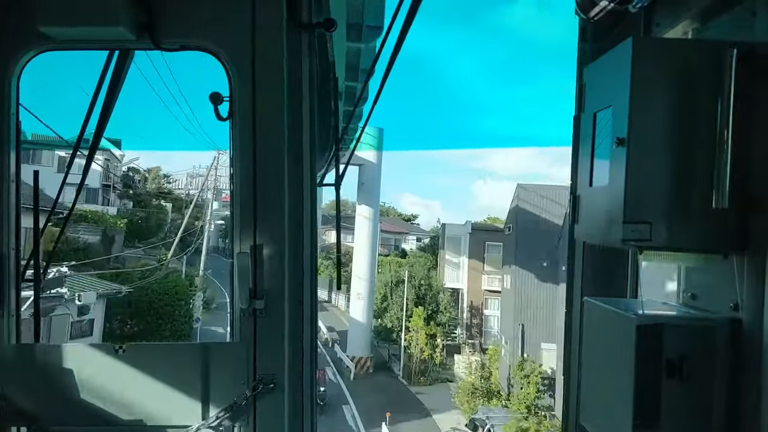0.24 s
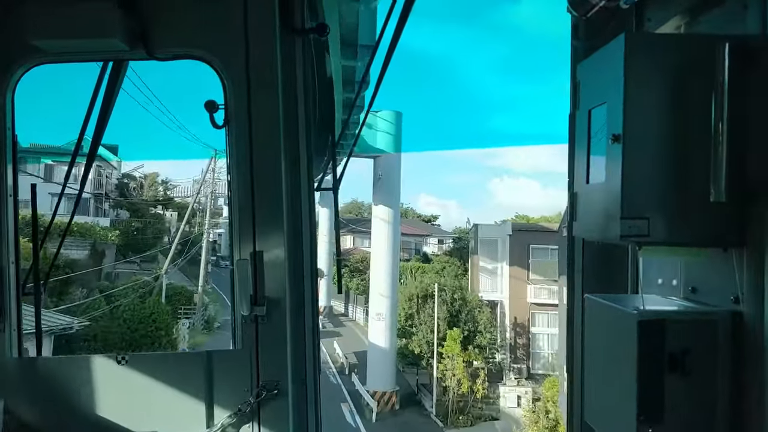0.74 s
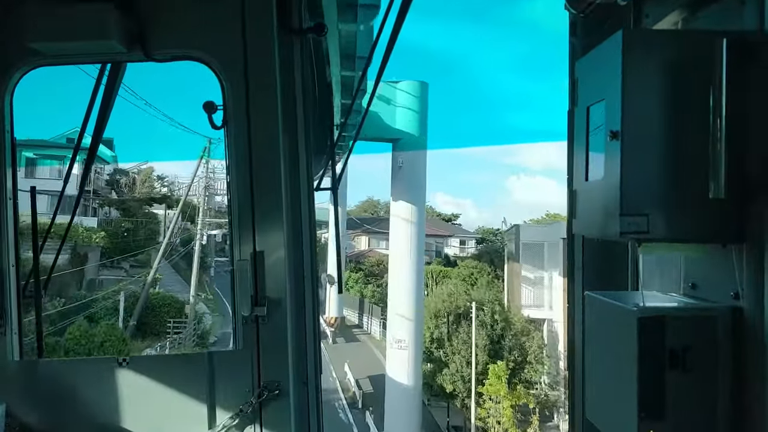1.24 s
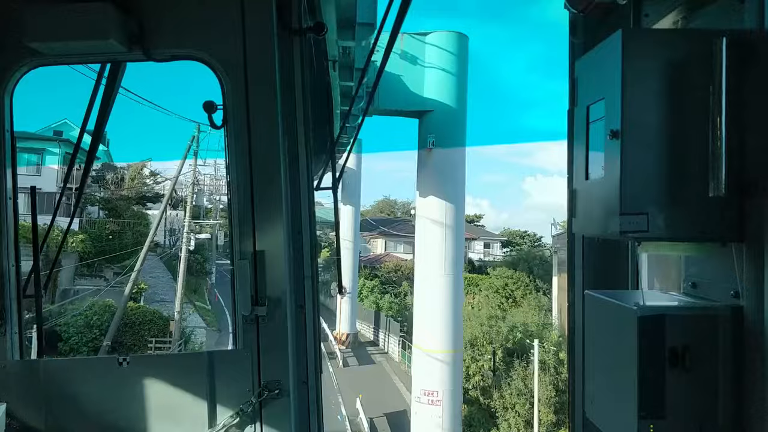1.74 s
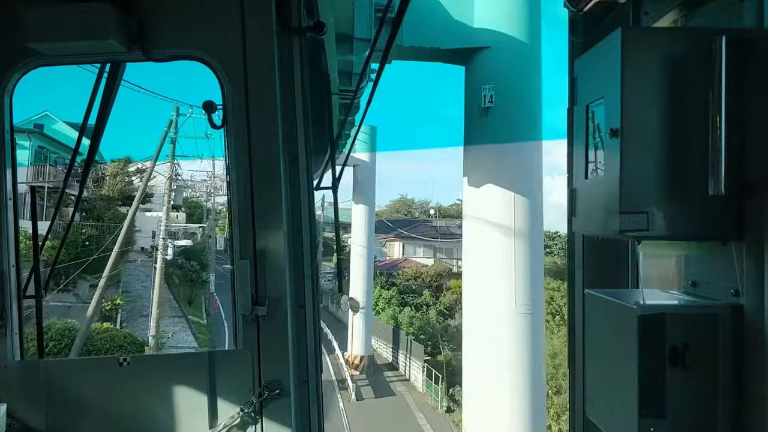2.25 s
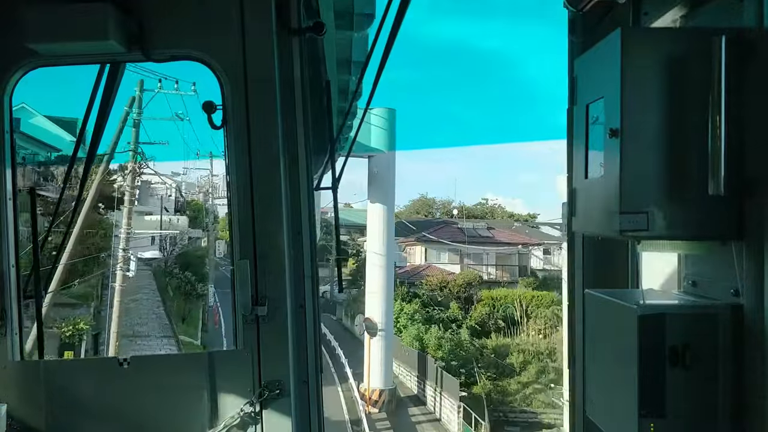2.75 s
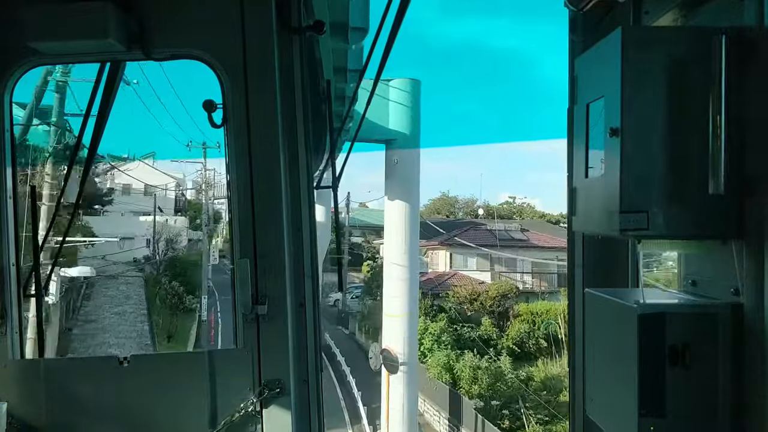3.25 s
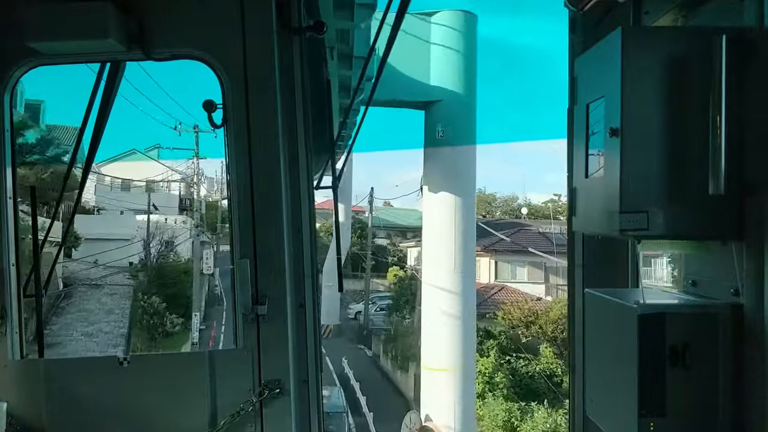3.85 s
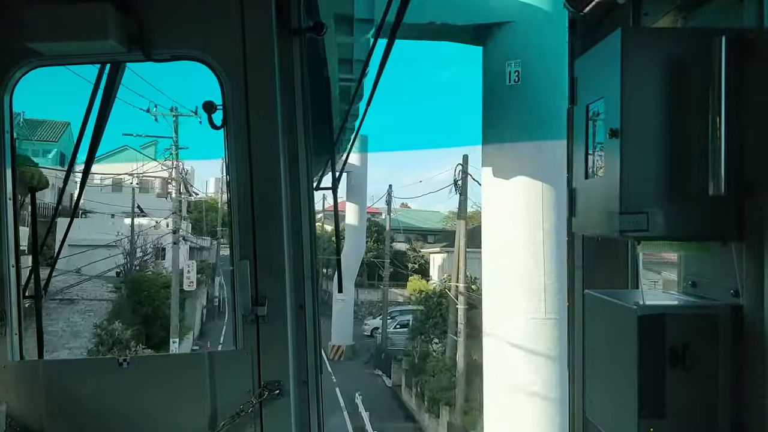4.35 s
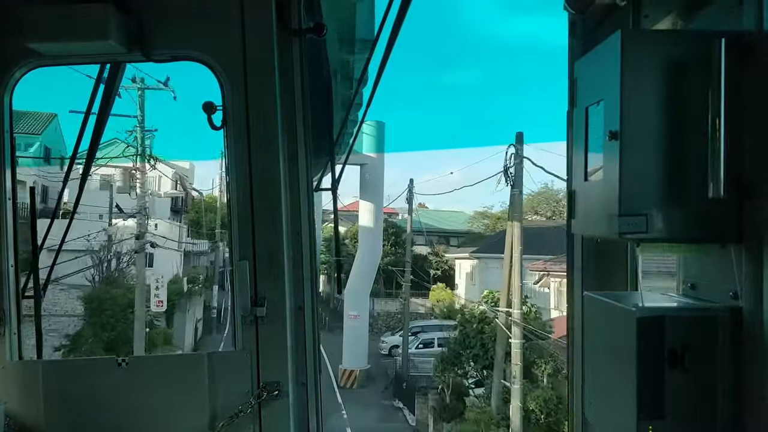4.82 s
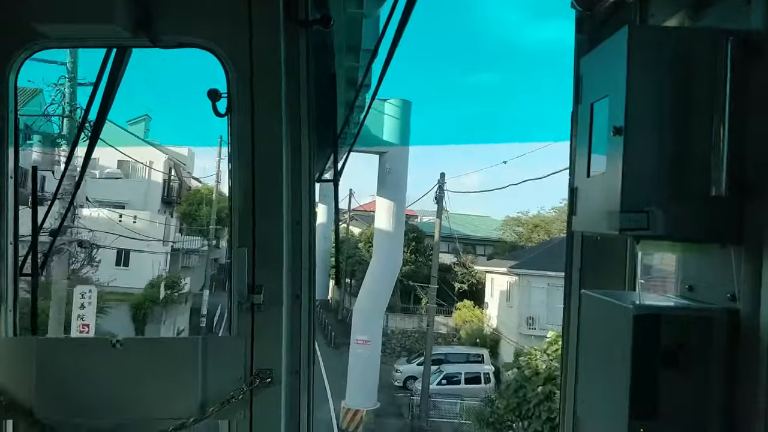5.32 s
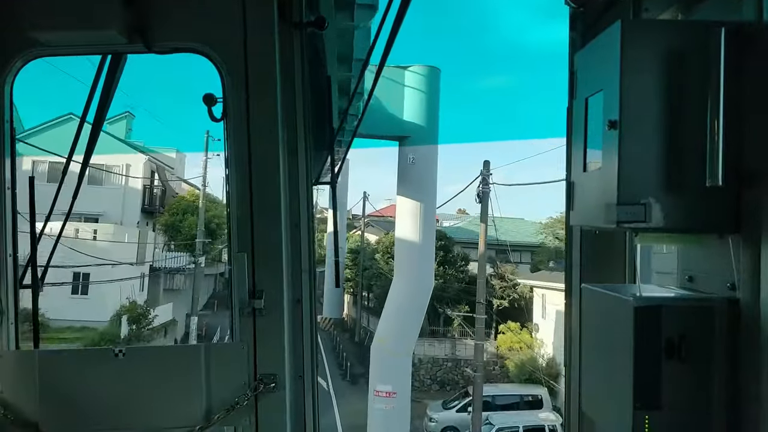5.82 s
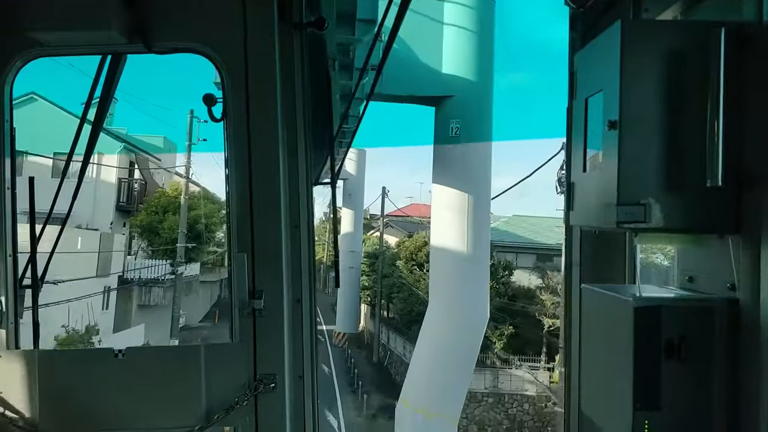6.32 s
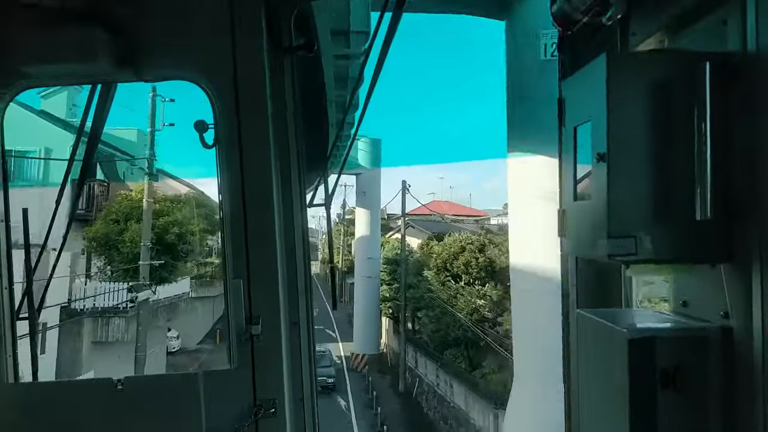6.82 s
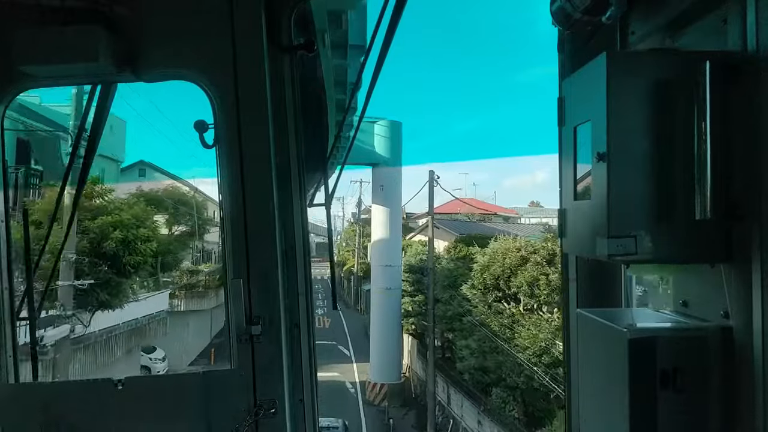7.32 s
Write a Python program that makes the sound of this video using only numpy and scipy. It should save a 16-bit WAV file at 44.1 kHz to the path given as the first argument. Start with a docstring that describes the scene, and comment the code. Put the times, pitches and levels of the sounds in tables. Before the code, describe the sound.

Inside a suspended train's front cab at speed, deep rumble and rubber-tyre roar surge with dull knocks, while loose fittings click and overhead contacts hiss.

```python
"""Suspended monorail, front cab at speed

A stereo microphone inside the cab. Coloured noise makes the car body's rumble and boom, and the roar
of rubber tyres in the girder, which surges over each bump; decaying tones make the dull and hard knocks.
Overhead the current collectors hiss, spit and briefly squeak in bands of high noise. Close around
the microphone, loose fittings and panels click, crack, tick and thump as short bursts and ringing modes.
"""
import sys
import numpy as np
from scipy import signal
from scipy.fft import rfft, irfft
from scipy.io import wavfile
from scipy.ndimage import uniform_filter1d, minimum_filter1d

SR = 44100
rng = np.random.default_rng(int(sys.argv[2]) if len(sys.argv) > 2 else 0)


def unload_wav(signal):
    """Save mono or channel-first audio to the path in sys.argv[1] as 16-bit WAV at rate SR, clipped to [-1, 1]."""
    wavfile.write(
        sys.argv[1],
        SR,
        np.round(np.clip(np.atleast_2d(signal).T, -1, 1) * 32767).astype(np.int16),
    )


N = 333837
TIME = np.arange(N) / SR  # s
HZ = np.fft.rfftfreq(N, 1 / SR)

# All table levels are relative; each layer adds its own trim. Positive left-right values lean left.
# Likeness of the two microphone channels. Each row: frequency in Hz, correlation from 0 to 1.
LIKENESS = [(20, .997), (60, .975), (120, .88), (180, .65), (240, .48), (310, .68), (390, .7), (450, .42),
            (510, .68), (640, .64), (740, .22), (930, .25), (1200, 0), (16000, 0)]
# Slow swells of the car body. Each row: time in seconds, deep shaking in dB, boom of the cabin air in dB.
BODY_SWELLS = [(0, -17.5, -23), (.75, -16, -22), (1.05, -23.5, -26), (1.45, -17, -27), (1.7, -20.5, -20.5),
               (2.03, -15, -20), (2.2, -15, -29), (3.0, -19.5, -18), (3.3, -14, -19.5),
               (3.75, -19.5, -21.5), (4.05, -19.5, -15.5), (4.55, -19, -22.5), (5.0, -19, -16.5),
               (5.7, -16, -19), (6.55, -19, -18), (7.57, -16, -19)]
# Spectrum of the deep shaking. Each row: frequency in Hz, level in dB.
SHAKE_COLOUR = [(5, -10), (14, 8.5), (26, -3.5), (42, 4), (55, -51), (90, -3), (200, -99)]
# Spectrum of the running gear's drone. Each row: frequency in Hz, level in dB.
DRONE_COLOUR = [(30, -14), (52, -11), (72, 4), (88, -4), (115, -8), (145, -8.5), (200, -17), (500, -82)]
# The bogie frame thuds against its springs. Each row: start in seconds, level in dB.
THUDS = [(1.335, -3), (1.748, -3.5), (3.999, -3.5), (5.87, -6), (6.441, -0.5)]
# Low modes of the car. Each row: frequency in Hz, level in dB, 60 dB decay time in seconds.
THUD_MODES = [(61.3, -14, 0.68), (105, -18, 0.068), (136.7, 4.5, 0.18), (180, -23, 0.064)]
# A side panel thumps in its frame. Each row: start in seconds, peak in dB.
THUMPS = [(.528, -13), (1.058, -5.5), (3.114, -14), (3.659, -7.5), (4.03, -10), (5.078, -10), (5.188, -4),
          (6.698, -7.5), (7.095, -13), (7.36, -12)]
# Modes of the side panel. Each row: frequency in Hz, level in dB, 60 dB decay time in seconds.
THUMP_MODES = [(167.6, -5, 0.18), (250, -6, 0.08), (313, -2, 0.1), (426, -7, 0.12), (516, -3, 0.039)]
# A loose fitting clicks. Each row: start in seconds, level in dB, left-right difference in dB.
CLICKS = [(.2525, -41, 15), (.2585, -47, 6), (.318, -42, 9), (.627, -40, 17), (.704, -43, 15),
          (.8665, -47, 10), (1.0598, -33.5, 23), (1.7933, -32, 19), (2.2294, -40, 18), (2.372, -43, 12),
          (2.8198, -33.5, 20), (3.0125, -36.5, 17), (3.361, -35, 20), (3.987, -47, 10), (4.06, -35.5, 20),
          (4.396, -34.5, 17), (4.4693, -38.5, 15), (4.551, -34, 21), (4.6462, -42, 12), (4.924, -34.5, 15),
          (5.121, -41, 15), (5.1907, -31.5, 20), (6.378, -43, 10), (6.948, -41.5, 11), (7.3484, -44, 11),
          (7.3592, -37.5, 21)]
# Modes of the loose fitting. Each row: frequency in Hz, level in dB, 60 dB decay time in seconds.
CLICK_MODES = [(1270, -2, .012), (1560, -3, .014), (1760, -2, .013), (2150, 2.5, .016), (2420, 3, .011),
               (3400, -5, .008), (3750, -1, .011), (4270, -2, .009), (4750, -3, .008), (5300, -1, .009),
               (5650, -1.5, .009), (5950, -5, .008)]
# Wall panels crack as the car flexes. Each row: start in seconds, peak in dB, left-right difference
# in dB, brightness in dB per octave.
CRACKS = [(.527, -20, 6, -2), (.931, -22, 0, -7.5), (1.6134, -22, -1, -5), (2.0012, -29, 3, -3),
          (2.5712, -26, -1, -1), (2.6425, -19, 9, -14), (2.82, -23, 1, -1), (3.8496, -32, 6, -1),
          (4.0105, -33, -1, -9), (5.035, -29, 0, -2), (5.05, -21, -1, -9), (5.0778, -16.5, 2, -4.5),
          (5.094, -21, -3, -8), (5.1315, -24, 3, -3), (5.1544, -28, -7, 0), (5.191, -14.5, 1, -6),
          (5.352, -18, 5, 0.5), (5.506, -18, 0, -12), (5.6136, -27, -2, 0.5), (5.956, -25, -3, -4),
          (6.2035, -23, -6, -8), (6.299, -23, 2, -5), (6.376, -15.5, 7, -15), (7.012, -18.5, 14, -6)]
# Spectrum of a crack. Each row: frequency in Hz, level in dB.
CRACK_COLOUR = [(400, 9), (1200, 9), (1800, -1), (2300, 3), (3100, 1.5), (4800, 2), (6000, -7), (7400, -6),
                (8600, -17), (15000, -15)]
# A small metal part ticks. Each row: start in seconds, peak in dB.
TICKS = [(.2138, -38), (.35, -36), (.72, -45), (1.625, -40), (1.7657, -42), (1.8305, -38), (1.941, -44),
         (2.102, -40), (2.149, -36), (2.2076, -38), (2.2383, -35), (2.5112, -44), (2.5253, -42),
         (2.6168, -42), (2.8667, -37), (3.0011, -37), (3.1118, -42), (3.4486, -38), (3.713, -37),
         (4.1577, -44), (4.2235, -32), (4.5101, -33), (4.7391, -37), (4.757, -37), (4.916, -32),
         (5.0784, -44), (5.3203, -33), (5.46, -39), (5.6042, -34), (5.6623, -36), (5.9209, -37),
         (6.1409, -39), (6.2714, -37), (6.5315, -40), (7.1252, -37), (7.273, -31)]
# Spectrum of a tick. Each row: frequency in Hz, level in dB.
TICK_COLOUR = [(3000, -28), (6000, -2), (9000, -8), (10200, 4.5), (11200, 11.5), (12200, -16), (14000, 8),
               (16000, -23)]
# Thin squeaks of a collector. Each row: start in seconds, level in dB, length in seconds.
SQUEAKS = [(0.272, -46, 0.069), (0.582, -56, 0.044)]
# Steady sliding of the collectors. Each row: time in seconds, hiss in dB, fine sizzle in dB.
SLIDING = [(0.0, -50, -60), (0.93, -51, -64), (1.43, -47.5, -57.5), (1.71, -51.5, -62.5),
           (2.97, -51.5, -62.5), (3.1, -48, -60), (3.19, -50, -66), (3.73, -52.5, -58.5),
           (4.03, -52.5, -62.5), (4.45, -47.5, -58), (4.61, -50.5, -59), (4.75, -47, -60), (4.88, -51, -62),
           (5.08, -49.5, -60), (5.4, -45.5, -52.5), (5.84, -48.5, -58.5), (5.97, -48, -52.5),
           (6.27, -49, -59), (6.33, -52, -58), (6.42, -48.5, -55), (6.68, -46.5, -51.5), (6.75, -48, -57),
           (6.99, -52, -61), (7.07, -45, -58), (7.4, -56.5, -72), (7.57, -52, -65)]
# A collector spits and the hiss dies away in the girder. Each row: start in seconds, bright sizzle
# in dB, lower hiss in dB, 60 dB decay time in seconds.
SPITS = [(.043, -44, -62, 0.16), (.279, -46, -60, .37), (.335, -47, -41, 0.38), (.931, -46, -49, 0.32),
         (1.352, -37.5, -41, 0.18), (1.78, -47, -41, 0.48), (2.294, -45, -40, 0.3), (2.365, -42, -57, 0.18),
         (2.821, -41, -42, 0.37), (3.298, -39, -45, 0.33), (3.498, -40, -40, 0.51), (3.772, -38, -39, 0.31),
         (4.257, -36, -49, 0.22), (4.383, -40, -45, 0.27), (4.509, -45, -38.5, .2), (4.787, -39, -49, 0.16),
         (5.153, -40, -38, 0.23), (5.234, -43, -62, .35), (5.38, -43.5, -47, 0.3), (5.516, -45, -52, 0.24),
         (5.62, -53, -38, 0.41), (5.714, -40, -45, 0.27), (5.921, -37, -38.5, 0.27), (6.015, -42, -55, .27),
         (6.226, -43, -39, 0.29), (6.48, -45, -50, 0.27), (6.58, -45, -55, 0.4), (6.706, -42, -42, 0.29),
         (6.77, -41, -52, 0.21), (6.82, -59, -36.5, 0.32), (7.078, -45, -48, 0.56), (7.124, -37, -52, 0.24),
         (7.27, -39, -40, 0.26), (7.523, -41, -52, .35)]
# Spectrum of the collectors' hiss. Each row: frequency in Hz, level in dB.
HISS_COLOUR = [(600, 0), (1400, 6.5), (2100, 1.5), (2900, 2), (3900, 3), (5000, 1), (6000, -6.5),
               (7300, -8.5), (8600, -21), (11000, -29), (16000, -40)]
# Spectrum of the collectors' sizzle. Each row: frequency in Hz, level in dB.
SIZZLE_COLOUR = [(1500, -44), (4000, -5), (7000, -4), (8700, -9), (10200, -3), (12000, -2), (13500, 1.5),
                 (14800, 1), (16000, -0.5)]
# Placing of the sizzle. Each row: frequency in Hz, left-right difference in dB.
SIZZLE_PAN = [(4000, 13), (8500, -3), (10500, 0.5), (12000, 4.5), (13500, 11), (15000, 14), (16000, 20)]
# Roughness of the running surface, as rolling level. Each row: time in seconds, level in dB.
ROLL = [(0, -26), (.3, -23.5), (.5, -25.5), (.95, -25), (1.4, -18.5), (1.7, -23.5), (1.95, -24.5),
        (2.6, -25), (3.0, -24), (3.37, -27), (3.85, -21.5), (4.22, -24), (4.62, -22), (5.1, -24),
        (5.42, -21), (5.78, -24.5), (6.03, -19.5), (6.6, -24), (6.78, -27), (7.2, -24.5), (7.57, -28)]
# Brief dips, and a few lifts, of the roar. Each row: centre in seconds, level change in dB.
LULLS = [(1.155, -2), (1.41, -1), (1.505, 0.5), (2.366, -3.5), (2.63, -1.5), (3.255, -1), (3.395, -2),
         (3.62, -3), (3.985, -2), (4.235, 3), (4.63, -5.5), (4.89, -6), (5.125, -1), (5.168, 0.5),
         (5.27, -3), (5.77, -7.5), (5.925, -3), (6.306, 2), (6.485, -4.5)]
# The tyres hit a bump or land from a bounce. Each row: time in seconds, surge of the roar in dB,
# hard knock in dB, pitch in Hz, swell time in seconds.
BUMPS = [(.066, -31, -28, 486, 0.0053), (.132, -37, -32, 420, 0.0098), (.186, -24, -13.5, 517, 0.034),
         (.529, -26.5, -36, 450, 0.017), (.70, -25.5, -19, 524, 0.012), (.962, -23, -18, 534, 0.024),
         (1.058, -26, -22, 395, 0.0041), (1.112, -20, -33, 520, 0.016), (1.21, -28, -19, 370, 0.013),
         (1.32, -19.5, -25, 430, 0.0082), (1.432, -27, -11.5, 587, 0.019), (1.522, -23, -11.5, 540, 0.043),
         (1.598, -20.5, -12.5, 500, 0.02), (1.663, -21, -24, 408, 0.016), (1.748, -20.5, -16, 430, 0.029),
         (2.0, -22, -23, 527, 0.015), (2.138, -20.5, -23, 544, 0.016), (2.268, -27, -24, 397, 0.029),
         (2.387, -23.5, -14, 644, 0.025), (2.456, -20, -31, 483, 0.015), (2.524, -22, -25, 460, .016),
         (2.76, -25, -16, 485, 0.028), (3.024, -24, -26, 520, 0.014), (3.417, -28, -16.5, 610, 0.027),
         (3.486, -23.5, -17, 520, 0.029), (3.645, -27, -12.5, 555, 0.018), (3.752, -16.5, -9.5, 580, 0.023),
         (3.879, -14.5, -6.5, 537, 0.017), (4.005, -23.5, -13, 470, 0.024), (4.136, -18.5, -17, 420, 0.023),
         (4.26, -36, -19, 520, 0.023), (4.382, -18, -8.5, 530, 0.031), (4.515, -22.5, -16, 453, 0.021),
         (4.662, -19, -23, 540, 0.02), (4.692, -19.5, -12, 485, 0.025), (4.804, -26, -14, 516, 0.012),
         (5.048, -31, -28, 464, 0.035), (5.188, -26, -24, 386, 0.016), (5.293, -24, -25, 540, 0.011),
         (5.315, -16.5, -13, 450, 0.016), (5.404, -18.5, -21, 500, .014), (5.448, -19.5, -30, 433, 0.021),
         (5.508, -18.5, -14.5, 524, 0.019), (5.647, -19, -14, 525, 0.026), (5.95, -16.5, -11, 530, 0.018),
         (6.067, -6.5, -10, 570, 0.011), (6.088, -14, -11, 490, 0.0057), (6.208, -17.5, -23, 514, 0.014),
         (6.332, -32, -19, 605, 0.024), (6.408, -22, -11.5, 514, 0.027), (6.449, -16.5, -10.5, 523, 0.03),
         (6.513, -17, -9, 566, 0.015), (6.575, -16, -12, 500, 0.018), (6.632, -21, -19, 586, 0.036),
         (6.885, -23.5, -17.5, 432, 0.029), (7.078, -20.5, -16, 494, 0.047), (7.355, -20, -24, 450, 0.0092)]
# Spectrum of the tyres. Each row: frequency in Hz, level in dB.
TYRE_COLOUR = [(60, -1), (120, -5.5), (170, -2), (240, 1), (340, 2.5), (450, -4.5), (600, -7), (720, -14),
               (900, -16.5), (1250, -26), (1650, -29.5), (2100, -41), (4000, -43.5), (9000, -74)]
# Cabin resonances at the microphone. Each row: frequency in Hz, width in Hz, left in dB, right in dB.
CABIN = [(168, 18, 6, 4), (215, 50, 1, -2), (268, 14, 1.5, 3), (388, 16, 9, 5.5), (416, 12, 5, 0),
         (464, 27, -2, -3), (498, 24, 8, 1), (545, 10, 2, 8), (578, 20, 3, 4), (634, 26, 6, 7),
         (712, 24, 4, 1), (740, 18, 3, 7), (890, 30, 5, 4), (1130, 20, 4, 1), (1234, 16, 4, 1)]
# Modes of the cab after a knock. Each row: frequency in Hz, level in dB, 60 dB decay time in seconds.
KNOCK_MODES = [(377.4, -6, 0.27), (491.3, -2, 0.15), (570, -17, 0.032), (658.7, -9.5, 0.33),
               (730.4, -8, 0.17), (870, -16, 0.045), (1164, -17.5, 0.059)]


def gain_of(db):
    """Decibels to amplitude."""
    return 10 ** (np.asarray(db) / 20)


def evened(x):
    """Scales to rms 1."""
    return x / np.sqrt(np.mean(x ** 2) + 1e-20)


def read(points, hz):
    """Reads a spectrum table on a log-frequency axis."""
    f, value = np.transpose(points)
    return np.interp(np.log(hz + 1), np.log(f + 1), value)


def level(curve, column=1):
    """One dB column of a time curve as a gain for every sample."""
    rows = np.transpose(curve)
    return gain_of(np.interp(TIME, rows[0], rows[column]))


def sides(pan_db):
    """Left and right gains of unit mean power for a level difference."""
    pan = np.atleast_1d(pan_db)
    pair = gain_of(np.array([pan, -pan]) / 2)
    return pair / np.sqrt(np.mean(pair ** 2, axis=0))


def add(mix, s, sound):
    """Mixes a stereo sound in at time s."""
    part = mix[:, max(round(s * SR), 0):][:, :sound.shape[1]]
    part += sound[:, :part.shape[1]]


def wander(rate_hz):
    """Smooth random motion of rms 1: noise under a Gaussian low-pass."""
    return evened(irfft(rfft(rng.standard_normal(N)) * np.exp(-(HZ / rate_hz) ** 2), N))


def noise(colour_db, pan_db):
    """Coloured stereo noise, alike in the bass and diffuse in the treble."""
    a, b = rfft(rng.standard_normal((2, N)))
    same = np.clip(read(LIKENESS, HZ), -1, 1)
    pair = np.array([a, same * a + np.sqrt(1 - same ** 2) * b])
    return evened(irfft(pair * gain_of(colour_db) * sides(pan_db), N))


def steadied(x, span_s):
    """Evens out a noise's own swells slower than span_s, so that the ride sets its level."""
    power = np.mean(abs(signal.hilbert(x)) ** 2, axis=0)
    power = uniform_filter1d(power, max(int(span_s * SR), 1))
    return evened(x / np.sqrt(abs(power) + 1e-9))


def ringing(modes, phases, t):
    """Sum of struck modes: sines, each dying exponentially; phases in turns."""
    return sum(gain_of(db - 60 * t / t60) * np.sin(2 * np.pi * (hz * t + phase))
               for (hz, db, t60), phase in zip(modes, phases))


def snap(colour, decay_s, tail_db, tail_s, tilt_db=0):
    """A very short noise burst, followed by its scatter off the cab walls; peak near 1."""
    t = np.arange(SR // 10) / SR
    envelope = np.exp(-t / decay_s) + gain_of(tail_db) * np.exp(-t / tail_s)
    burst = rng.standard_normal((2, len(t))) * envelope
    hz = np.linspace(0, SR / 2, 65)
    colour_db = read(colour, hz) + tilt_db * np.log2(np.maximum(hz, 1200))
    taps = signal.firwin2(len(hz), hz, gain_of(colour_db), fs=SR)
    sound = signal.fftconvolve(burst, taps[None], axes=1)
    loudest = uniform_filter1d(sound ** 2, size=SR // 500, axis=1).max(axis=1, keepdims=True)
    return sound / np.sqrt(loudest) / gain_of(11)  # the peak stands about 11 dB over the rms


def throb(rate_hz=4.7, depth_db=4, deepest_s=4.98, fade_s=1.75):
    """Gain of a slow throb in the bass, deepest mid-ride and fading either side."""
    t = TIME - deepest_s
    return gain_of(depth_db * np.exp(-(t / fade_s) ** 2) * np.cos(2 * np.pi * rate_hz * t))


def car_body(boom_hz=57.9, boom_width_hz=4.8, drone_db=-21, drone_growth_db_per_s=0.19):
    """Deep shaking, the growing drone of the running gear, and one narrow air mode of the cabin."""
    shake = steadied(noise(read(SHAKE_COLOUR, HZ), .4), 0.19) * level(BODY_SWELLS)
    drone = steadied(noise(read(DRONE_COLOUR, HZ), 1.0), 0.1)
    drone = drone * gain_of(drone_db + drone_growth_db_per_s * TIME)
    mode_db = -20 * np.log10(1 + ((HZ - boom_hz) / boom_width_hz) ** 2)
    boom = steadied(noise(mode_db, 0.86), 0.13) * level(BODY_SWELLS, 2)
    return shake + (drone + boom) * throb()


def thuds(thud_db=-2, rise_s=0.034):
    """Soft, deep blows that ring the low modes of the car."""
    out, t = np.zeros((2, N)), np.arange(SR // 3) / SR
    for s, db in THUDS:
        modes = ringing(THUD_MODES, rng.random(len(THUD_MODES)), t)
        add(out, s, gain_of(db + thud_db) * sides(1) * modes * (1 - np.exp(-t / rise_s)))
    return out


def thumps(thump_db=-4, pan_db=8, rise_s=0.0027):
    """Short hollow blows that ring a panel to the left of the microphone."""
    out, t = np.zeros((2, N)), np.arange(SR // 6) / SR
    for s, db in THUMPS:
        modes = ringing(THUMP_MODES, rng.random(len(THUMP_MODES)), t)
        blow = modes * (1 - np.exp(-t / rise_s))
        add(out, s, gain_of(db + thump_db) * sides(pan_db) * blow / abs(blow).max())
    return out


def click(rise_s=.0005, detune=0.014, variety_db=3.5, scatter_db=-24, scatter_s=0.014):
    """Damped modes of the loose fitting, varied at each blow, with early reflections; rms 1 at the start."""
    t = np.arange(SR // 16) / SR
    shifts = 1 + detune * rng.uniform(-1, 1, len(CLICK_MODES))
    favour_db = variety_db * rng.uniform(-1.1, 1, len(CLICK_MODES))
    struck = [(hz * shift, db + favour, t60)
              for (hz, db, t60), shift, favour in zip(CLICK_MODES, shifts, favour_db)]
    # neighbouring modes start in opposite directions
    modes = ringing(struck, np.arange(len(struck)) % 2 / 2, t) * (1 - np.exp(-(t / rise_s) ** 2))
    shape = (2, len(t))
    sparse = rng.standard_normal(shape) * (rng.random(shape) < .08)
    walls = gain_of(scatter_db) * sparse * np.exp(-t / scatter_s)
    walls[:, 0] = 1  # the direct sound
    sound = signal.fftconvolve(modes[None], walls, axes=1)
    return sound / np.sqrt(np.mean(sound[:, :SR // 300] ** 2))


def chatter(count=70, crack_db=-38, tick_db=-53, range_db=6):
    """Faint small cracks and ticks strewn at random around the cab."""
    out = np.zeros((2, N))
    for crack_at, size, tick_at in rng.random((count, 3)):
        size_db = range_db * size
        crack = snap(CRACK_COLOUR, 0.0023, -14, 0.0077, tilt_db=1.0)
        add(out, crack_at * N / SR, gain_of(crack_db + size_db) * crack)
        tick = snap(TICK_COLOUR, 0.0024, -15, .012)
        add(out, tick_at * N / SR, gain_of(tick_db + size_db) * tick)
    return out


def fittings(click_db=1.5, crack_db=7.0, tick_db=3, tick_pan_db=2):
    """Ringing clicks and noise-burst cracks and ticks, over the faint chatter."""
    out = chatter()
    for s, db, pan in CLICKS:
        add(out, s, gain_of(db + click_db) * sides(pan) * click())
    for s, db, pan, tilt in CRACKS:
        crack = snap(CRACK_COLOUR, 0.0011, -17, 0.013, tilt)
        add(out, s, gain_of(db + crack_db) * sides(pan) * crack)
    for s, db in TICKS:
        tick = snap(TICK_COLOUR, 0.0013, -12, 0.017)
        add(out, s, gain_of(db + tick_db) * sides(tick_pan_db) * tick)
    return out


def squeaks(squeak_hz=13600, width_hz=260):
    """A collector sings briefly in a narrow, very high band of noise."""
    swell = sum(gain_of(db) * np.sin(np.pi * np.clip((TIME - s) / length, 0, 1))
                for s, db, length in SQUEAKS)
    return swell * noise(-20 * np.log10(1 + ((HZ - squeak_hz) / width_hz) ** 2), 6)


def spits(spit_db=-2, snap_s=0.0028):
    """Power of the bright and lower parts of each spit, a fast onset with an exponential decay."""
    bright, lower = np.zeros((2, N))
    for s, bright_db, lower_db, t60 in SPITS:
        span = slice(int(s * SR), int((s + .5) * SR))
        age = np.maximum(TIME[span] - s, 0)
        tail = gain_of(-60 * age / t60)
        # the sizzle starts with a sharp snap; the lower hiss swells a moment later
        sharp = (tail + np.exp(-age / snap_s)) * (1 - np.exp(-age / 0.00078))
        bright[span] += (gain_of(bright_db + spit_db) * sharp) ** 2
        lower[span] += (gain_of(lower_db) * tail * (1 - np.exp(-age / 0.0015))) ** 2
    return bright, lower


def collectors(force, hiss_db=3, sizzle_db=4, jolt_share=0.23, flutter_db=0.8, sputter_db=2.0):
    """Sliding contacts hiss, a little more on each jolt, and spit bursts of bright sizzle."""
    bright, lower = spits()
    sliding = gain_of(hiss_db) * level(SLIDING) * evened(force) ** jolt_share
    sliding = sliding * gain_of(flutter_db * wander(22.0))
    hiss = noise(read(HISS_COLOUR, HZ), 0.13) * np.sqrt(sliding ** 2 + lower)
    fine = gain_of(sizzle_db) * level(SLIDING, 2) * gain_of(sputter_db * wander(20))
    sizzle = noise(read(SIZZLE_COLOUR, HZ), read(SIZZLE_PAN, HZ)) * np.sqrt(fine ** 2 + bright)
    return hiss * gain_of(0.78 * wander(110)) + sizzle


def tyre_force(uneven_db=2.0, uneven_hz=16, surge_lead_s=0.0086, usual_hz=521, lull_half_s=0.015):
    """Uneven rolling contact that surges on each bump; also the hardness, in octaves from the usual pitch."""
    power = (level(ROLL) * gain_of(uneven_db * wander(uneven_hz))) ** 2
    hardness = np.zeros(N)
    for s, db, _, hz, swell_s in BUMPS:
        near = slice(max(int((s - .1) * SR), 0), int((s + .4) * SR))
        # the tyre starts to climb the bump just before it knocks
        u = np.maximum(TIME[near] - s + surge_lead_s, 0) / swell_s
        surge = (gain_of(db) * u * np.exp(1 - u)) ** 2
        power[near] += surge
        hardness[near] += surge * np.log2(hz / usual_hz)
    lull_db = sum(db * np.exp(-np.minimum(((TIME - s) / lull_half_s) ** 2, 20)) for s, db in LULLS)
    return np.sqrt(power) * gain_of(lull_db), hardness / power


def roar(force, hardness, low_db=-4.0, middle_db=-3, upper_db=-5.0, tilt_db=7):
    """Tyre noise through the cabin's resonances: hard bumps lift its upper band, soft ones its middle."""
    cabin_db = sum(np.array([[left], [right]]) / (1 + (2 * (HZ - hz) / width) ** 2)
                   for hz, width, left, right in CABIN)
    spectrum = rfft(noise(read(TYRE_COLOUR, HZ) + cabin_db, 0.42))
    bass, below_upper = (1 / (1 + (HZ / hz) ** 12) for hz in (207.5, 447))  # band edges
    low = steadied(irfft(spectrum * bass, N), 0.09)
    middle = steadied(irfft(spectrum * (below_upper - bass), N), 0.048)
    upper = steadied(irfft(spectrum * (1 - below_upper), N), 0.019)
    low = low * gain_of(low_db)
    middle = middle * gain_of(middle_db - tilt_db * hardness)
    upper = upper * gain_of(upper_db + tilt_db * hardness)
    return force * (low + middle + upper)


def tyres(force, hardness, flutter_db=0.27, flutter_hz=90, slap_db=-49, slap_hz=1250, slap_growth=0.3):
    """The fluttering roar, and a band of slapping noise that grows gently with the force."""
    slap = noise(-14 * np.log2((HZ + 1) / slap_hz) ** 2, .5) * gain_of(3.0 * wander(100))
    fluttering = roar(force, hardness) * gain_of(flutter_db * wander(flutter_hz))
    return fluttering + gain_of(slap_db) * evened(slap * force ** slap_growth)


def judder(force, bump_db=-17.0, per_second=55, spread_db=4.0, decay_s=0.0015):
    """Small blows of the tread follow the tyre force; each rings a panel for a few cycles."""
    out, t = np.zeros((2, N)), np.arange(SR // 30) / SR
    at = np.flatnonzero(rng.random(N) < per_second / SR)
    for i, (pitch, size, pan, lag) in zip(at, rng.random((len(at), 4))):
        hz = 380 * 3 ** pitch
        # higher blows are less alike at the two ears
        turns = hz * t + np.array([[0], [(lag - .5) * pitch]])
        bump = np.sin(2 * np.pi * turns) * np.exp(-t / decay_s) * (1 - np.exp(-t / 0.00019))
        size_db = bump_db + 18 * (1 - pitch) + spread_db * min(-np.log(1 - size), 2.5)
        add(out, i / SR, force[i] * gain_of(size_db) * sides(8 * (pan - .5)) * bump)
    return out


def knocks(knock_db=1, ring_db=-8, swell_s=0.0016, spread_db=2, edge_db=-16):
    """Each knock is a blow of a few cycles with a rough edge, after which the cab rings briefly."""
    out, t = np.zeros((2, N)), np.arange(SR // 8) / SR
    u = t / swell_s
    apart = np.array([[0], [.12]])  # turns: the ring reaches the two ears out of step
    for s, _, db, hz, _ in BUMPS:
        blow_phase, *phases = rng.random(len(KNOCK_MODES) + 1)
        blow = u * np.exp(1 - u) * np.sin(2 * np.pi * (hz * t + blow_phase))
        modes = ringing(KNOCK_MODES, [p + apart * np.sign(p - .5) for p in phases], t)
        size = gain_of(db + knock_db) * sides(spread_db)
        add(out, s, size * (blow + gain_of(ring_db) * modes * (1 - np.exp(-u))))
        edge = snap(CRACK_COLOUR, 0.0011, -24, 0.013, tilt_db=-2)
        add(out, s, size * gain_of(edge_db) * edge)
    return out


def scene():
    """Everything heard in the cab; one tyre force drives roar, judder and sliding hiss."""
    force, hardness = tyre_force()
    background = car_body() + thuds() + thumps() + fittings()
    overhead = squeaks() + collectors(force)
    running = tyres(force, hardness) + judder(force) + knocks()
    return background + overhead + running


def record(dry, ceiling=.86, edge_hz=15790):
    """A fast limiter holds the highest peaks; then a steep low-pass cuts the top treble."""
    room = np.minimum(ceiling / (abs(dry).max(axis=0) + 1e-9), 1)
    held = dry * uniform_filter1d(minimum_filter1d(room, size=601), size=601)
    low_pass = signal.firwin(801, edge_hz, window=("kaiser", 9), fs=SR)
    return signal.oaconvolve(held, low_pass[None], "same", axes=1)


dry = scene()
out = record(dry)
unload_wav(out)
```